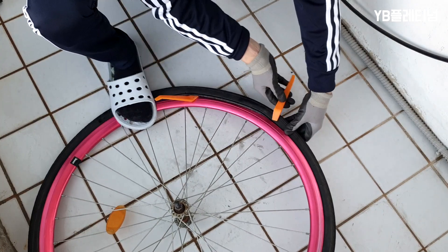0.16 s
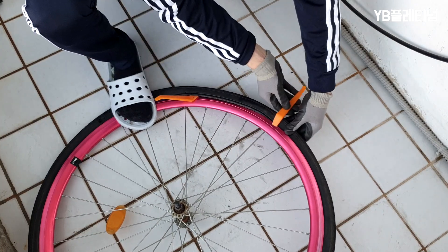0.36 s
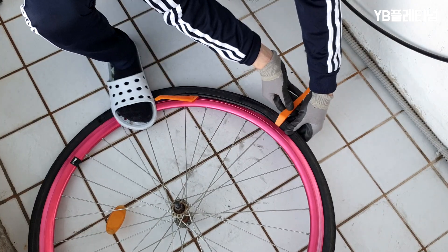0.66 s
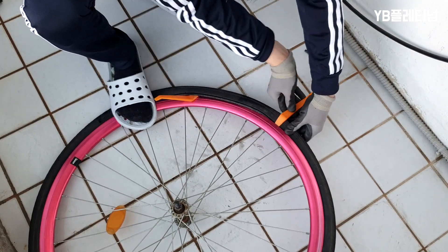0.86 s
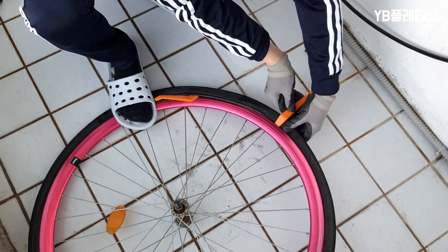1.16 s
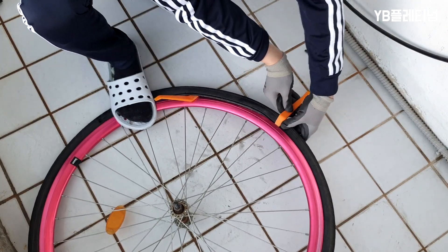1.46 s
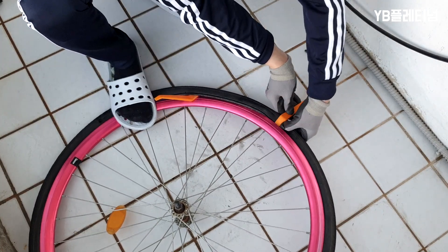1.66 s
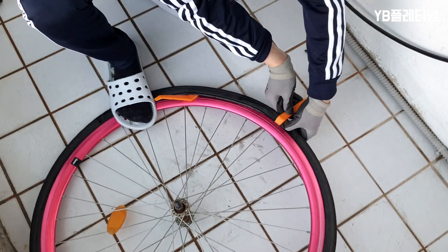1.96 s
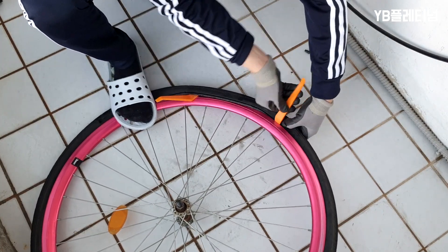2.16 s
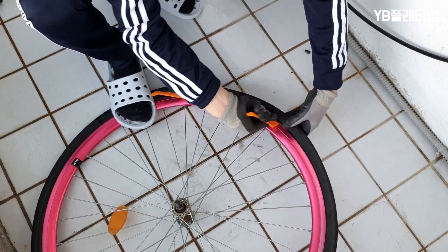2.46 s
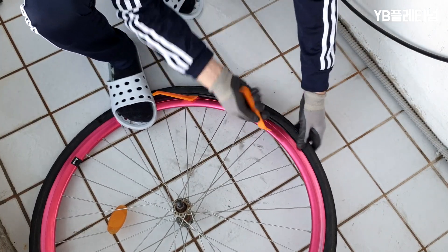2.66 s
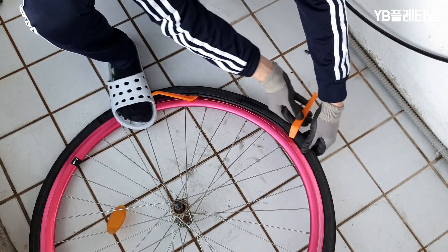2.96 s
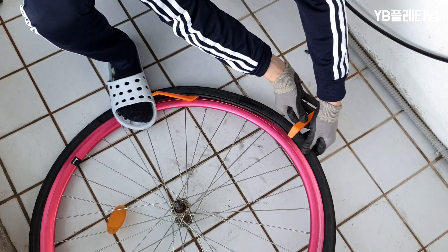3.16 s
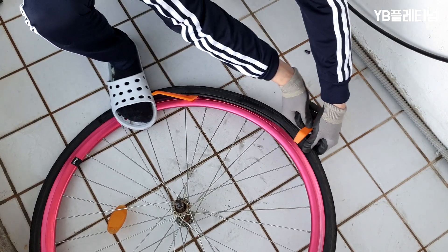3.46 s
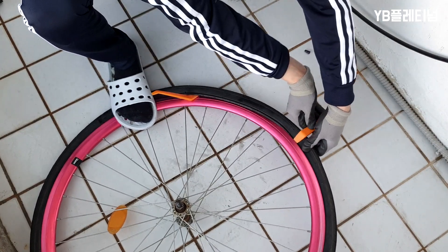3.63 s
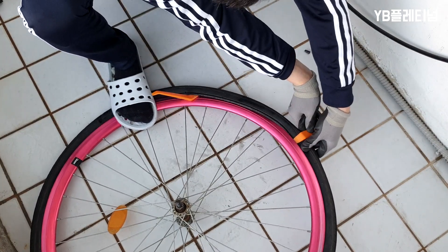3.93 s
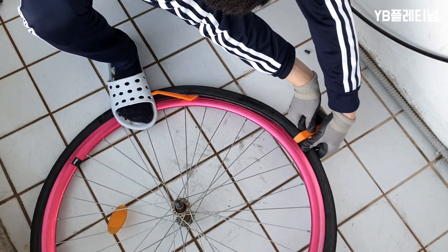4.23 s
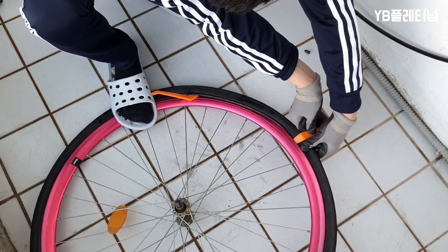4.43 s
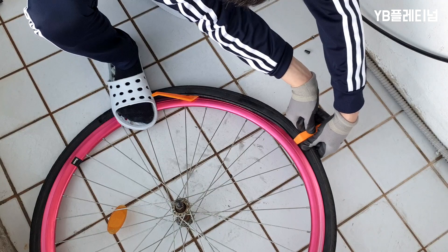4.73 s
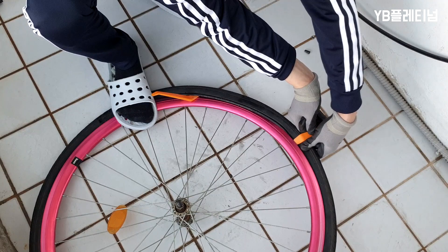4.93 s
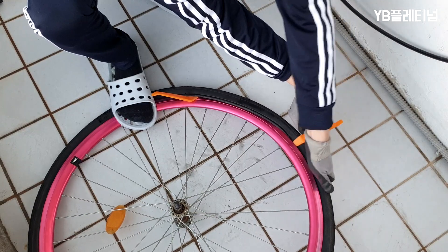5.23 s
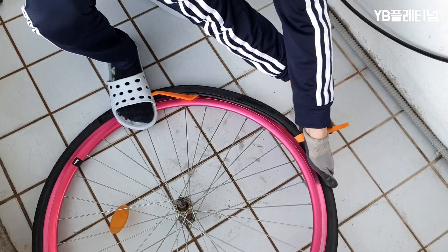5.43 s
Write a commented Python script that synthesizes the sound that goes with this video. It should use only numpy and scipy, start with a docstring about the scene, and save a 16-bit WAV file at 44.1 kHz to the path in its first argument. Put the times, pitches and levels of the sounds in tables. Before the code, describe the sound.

Plastic levers prise a bicycle tire off its metal rim in a small tiled room, with rubbing, clicks, thuds and ringing snaps.

```python
"""In a small tiled room, plastic levers prise a bicycle tire off its metal rim on the floor.
The slipping bead snaps in noise bursts and rings tire, spokes and rim as banks of fading sines.
Lever ticks are short noise clicks; gloves, lever and rubber rub in streams of tiny slips; faint squeals glide.
The pressed wheel shudders as a wavering low hum over a faint steady rush of air, made of coloured noise."""
import sys
import numpy as np
from scipy import signal
from scipy.fft import rfft, irfft, next_fast_len
from scipy.io import wavfile
from scipy.ndimage import map_coordinates

SR = 44100
rng = np.random.default_rng(int(sys.argv[2]) if len(sys.argv) > 2 else 0)


def waveform_to_disk(signal):
    """Save audio, clipped to [-1, 1], as 16-bit WAV at the path in sys.argv[1]."""
    frames = np.transpose(np.atleast_2d(signal))
    scaled = np.clip(frames, -1, 1) * 32767
    samples = np.round(scaled).astype(np.int16)
    wavfile.write(sys.argv[1], SR, samples)


N = 246430
TIME = np.arange(N) / SR
CUTOFF_HZ = 15900
# Every level below is a mix level, ahead of the final left and right gains.


def from_db(db):
    """Decibels to gain."""
    return 10 ** (np.asarray(db) / 20)


def rms(x):
    """Root mean square."""
    return np.sqrt(np.mean(x ** 2) + 1e-20)


def at_hz(points, hz):
    """Read a table on a log-frequency axis."""
    f, value = np.transpose(points)
    return np.interp(np.log(np.maximum(hz, 1)), np.log(f), value)


def band(x, low, high, order=2):
    """Causal band-pass."""
    sos = signal.butter(order, [low, min(high, .45 * SR)], "band", fs=SR, output="sos")
    return signal.sosfilt(sos, x)


def coloured(x, spectrum):
    """Shape a sound with a spectrum curve, then scale it to rms 1."""
    size = next_fast_len(x.shape[-1])
    gain = from_db(at_hz(spectrum, np.fft.rfftfreq(size, 1 / SR)))
    y = irfft(rfft(x, size) * gain, size)[..., :x.shape[-1]]
    return y / rms(y)


def drift(per_s):
    """Smooth random wandering through normal-distributed knots, per_s of them a second."""
    knots = rng.standard_normal(4096)
    return map_coordinates(knots, [TIME * per_s], order=3, mode="wrap")


def add(out, sound, s):
    """Mix a sound in at a time."""
    i = max(round(s * SR), 0)
    out[:, i:i + sound.shape[-1]] += sound[:, :N - i]


def at_ears(x, lag_s=.00034):
    """Direct sound reaches the left ear a moment before the right."""
    late = np.pad(x, (round(lag_s * SR), 0))[:len(x)]
    return np.array([x, late])


# how alike the two ears hear the sound: [f/Hz, left-right correlation 0-1]
EAR_LIKENESS = [(60, .97), (140, .95), (300, .75), (640, .5), (1400, 0.05), (16000, 0.02)]


def stereo_noise(size):
    """White noise, alike at both ears in the bass and nearly unrelated in the treble."""
    mid, side = rfft(rng.standard_normal((2, size)))
    alike = np.clip(at_hz(EAR_LIKENESS, np.fft.rfftfreq(size, 1 / SR)), -.99, .99)
    shared, opposed = np.sqrt(1 + alike) * mid, np.sqrt(1 - alike) * side
    return irfft(shared + opposed * [[1], [-1]], size) / np.sqrt(2)


# how long the tiles hold the sound: [f/Hz, t60/s]
ROOM_DECAY = [(100, 1), (260, 0.67), (700, 0.49), (1840, 0.42), (4850, 0.39), (12800, 0.22)]


def tiled_room(size=32768, build_up_s=0.00093):
    """Dense echoes of the tiles, dying sooner in the treble; unit energy at each ear on average."""
    t, hz = np.arange(size) / SR, np.fft.rfftfreq(size, 1 / SR)
    noise, tail = rfft(stereo_noise(size)), 0
    centres, t60s = np.transpose(ROOM_DECAY)
    # overlapping bands, each with its own decay
    for weights, t60 in zip(np.eye(len(centres)), t60s):
        one_band = irfft(noise * at_hz(np.c_[centres, weights], hz))
        tail = tail + one_band * from_db(-60 * t / t60)
    tail = tail * (1 - np.exp(-t / build_up_s))
    return tail / (rms(tail) * np.sqrt(size))


def heard(x, room, wet_db):
    """Direct sound plus the room's answer."""
    answer = signal.fftconvolve(x, room, axes=1)[:, :x.shape[-1]]
    return x + from_db(wet_db) * answer


# colour of the steady air in the room: [f/Hz, density level/dB per Hz]
AIR_COLOUR = [(20, -17), (55, 1), (100, -8), (160, -13), (300, -15), (630, -15.5), (1000, -11),
              (1350, -13.5), (1650, -19.5), (2100, -30), (4000, -37), (7000, -36.5), (8500, -39),
              (13000, -35), (16000, -37)]
AIR_DB = -66.5   # rms between 300 and 1800 Hz


def air():
    """Steady room noise with a soft hump near one kilohertz."""
    noise = coloured(stereo_noise(next_fast_len(N, True))[:, :N], AIR_COLOUR)
    return from_db(AIR_DB) * noise / rms(band(noise, 300, 1800))


# pushes that set the wheel shuddering: [start t/s, length t/s, f/Hz, level/dB]
SHUDDER_PUSHES = [(0.0, 0.52, 54.5, -64), (0.817, .07, 54, -71), (0.936, .1, 47, -64.5),
                  (1.06, 0.52, 52, -57.5), (1.85, 0.44, 51.9, -59.5), (2.232, 0.049, 57, -56),
                  (2.577, 0.084, 54.6, -61.5), (2.725, 0.17, 54.2, -56.5), (2.992, 0.092, 47.4, -67),
                  (3.284, 0.053, 53, -51.5), (3.356, 0.072, 55, -51), (3.485, .05, 55, -58),
                  (3.677, 0.33, 60.6, -61), (4.288, 0.057, 55.4, -62), (4.77, 0.076, 55, -65),
                  (5.117, 0.17, 59.5, -53), (5.41, .18, 65.2, -54.5)]
SHUDDER_ATTACK_S, SHUDDER_FADE_S = 0.029, 0.041   # swell; fall by 20 dB


def shudder(waver_hz=2.83, unsteady_db=0.5):
    """The wheel's lowest bending motion: it swells with each push, wavers under the hands and dies on release."""
    out, waver = np.zeros(N), waver_hz * drift(21.02)
    for s, length_s, hz, db in SHUDDER_PUSHES:
        released_s = np.maximum(TIME - s - length_s, 0)
        swell = np.clip((TIME - s) / SHUDDER_ATTACK_S, 0, 1)
        gain = swell * from_db(db - 20 * released_s / SHUDDER_FADE_S)
        hum = np.sin(2 * np.pi * np.cumsum(hz + waver) / SR)
        out += gain * np.sqrt(2) * hum
    return out * from_db(unsteady_db * drift(14))


MIN_FADE_S = .06   # the room keeps a rub from stopping dead; shorter or negative fades become this


def strokes(rows):
    """Gain over time: each rub swells as the hand speeds up, then dies away."""
    gain = np.zeros(N)
    for s, swell_s, fade_s, db in rows:
        age = np.maximum(TIME - s, 0)
        fall_db = 20 * np.maximum(age - swell_s, 0) / max(fade_s, MIN_FADE_S)
        gain += np.minimum(age / swell_s, 1) ** 2 * from_db(db - fall_db)
    return gain


def friction(rows, colour, room, slips_per_s, size_db, wet_db):
    """Rubbing is a stream of tiny slips of uneven size, swelling with the stroke."""
    slips = (rng.random(N) < slips_per_s / SR) * rng.choice([-1, 1], N)
    sizes = from_db(size_db * np.minimum(rng.exponential(1, N), 4))
    rub = heard(at_ears(coloured(slips * sizes, colour)), room, wet_db)
    return rub / rms(rub) * strokes(rows)


# gloves and sleeves rubbing: [start t/s, swell t/s, 20 dB fade t/s before the minimum, level/dB]
RUSTLE_STROKES = [(0.0, 0.025, 0.13, -51), (1.10, 0.041, 0.0748, -51), (1.19, 0.038, 0.08, -51.5),
                  (2.63, 0.021, 0.61, -55.5), (2.80, 0.025, 0.03, -55.5), (3.36, 0.11, -0.16, -59.5),
                  (4.265, 0.011, 0.4, -66.5), (4.86, 0.045, 0.54, -66.5), (5.18, 0.011, 0.44, -64.5),
                  (5.36, 0.032, .15, -62.5)]
# colour of the cloth: [f/Hz, density level/dB per Hz]
CLOTH_COLOUR = [(1760, 3), (3000, -15), (4260, -7), (4800, -1), (6530, 5.5), (10200, 4), (11800, 7),
                (15500, 2.5), (16000, -14)]


def rustle(room):
    """Gloves and sleeves rub in a dense, bright stream of slips."""
    return friction(RUSTLE_STROKES, CLOTH_COLOUR, room, slips_per_s=1300, size_db=6.5, wet_db=14.0)


# rubber bead dragging over the rim: [start t/s, swell t/s, 20 dB fade t/s before the minimum, level/dB]
DRAG_STROKES = [(0.0, 0.045, 0.3, -61.5), (.15, 0.037, -0.36, -62), (.42, 0.067, 0.46, -59),
                (1.24, 0.072, 0.3, -55.5), (1.4, 0.064, -0.24, -60.5), (2.25, 0.041, 0.27, -58.5),
                (2.8, 0.084, 0.53, -59.5), (4.25, 0.084, -0.08, -60.5)]
# colour of the rubber: [f/Hz, density level/dB per Hz]
RUBBER_COLOUR = [(41, -59), (70, -2.5), (224, -11.5), (313, -33), (397, -7), (447, -18), (510, -2),
                 (595, -27), (792, -5.5), (946, -12), (1200, -9), (1560, -18), (2640, -120)]


def drag(room):
    """The rubber bead drags over the rim in sparse, dark slips."""
    return friction(DRAG_STROKES, RUBBER_COLOUR, room, slips_per_s=130, size_db=0.5, wet_db=-4.0)


# lever sliding between bead and rim: [start t/s, swell t/s, 20 dB fade t/s before the minimum, level/dB]
SCRAPE_STROKES = [(0.0, 0.0014, 0.09, -47.5), (.42, 0.078, -0.4, -61), (1.16, 0.11, -0.2, -59.5),
                  (2.0, 0.076, 0.0936, -51.5), (2.27, 0.045, 0.2, -61.5), (2.45, .018, 0.84, -73),
                  (2.55, .05, 0.42, -64), (2.66, 0.027, 0.04, -55.5), (3.34, .05, -0.14, -66),
                  (4.22, 0.042, 0.8, -73), (4.86, 0.057, 0.26, -64.5)]
# colour of the sliding lever: [f/Hz, density level/dB per Hz]
SLIDE_COLOUR = [(530, -32), (900, -26), (1340, 6), (2250, -2.5), (2450, -2.5), (4360, -4.5), (7490, -0.5),
                (8230, -9), (15000, -12)]


def scrape(room):
    """The lever slides between bead and rim in slips blurred by the room."""
    return friction(SCRAPE_STROKES, SLIDE_COLOUR, room, slips_per_s=600, size_db=-2.0, wet_db=28.0)


# thin squeals while the lever bears on the tire, one curve each: [t/s, pitch f/Hz, relative level/dB]
SQUEAL_CURVES = [
    [(.78, 9436, -82), (.85, 11950, -65.5), (.92, 13900, -61.5), (1.01, 13760, -66), (1.045, 12700, -63),
     (1.1, 14050, -61), (1.23, 11370, -62)],
    [(2.75, 11950, -60), (2.9, 12200, -68), (2.99, 11750, -58), (3.05, 11500, -69), (3.1, 10270, -67)],
    [(4.37, 10300, -91), (4.47, 12960, -68), (4.56, 13640, -63.5), (4.69, 14100, -62.5), (4.76, 13000, -61),
     (4.84, 13650, -65), (5.0, 11250, -76)],
]
# strands of a squeal: [f/Hz at the reference pitch, pitch following 0-1 (at least 0.1), relative level/dB]
STRANDS = [(7710, 0.2, 0.5), (9900, 0.7, -15), (11500, 1, -11), (13900, 1, 2)]
# colour of the hiss that comes with them: [f/Hz, density level/dB per Hz]
HISS_COLOUR = [(3000, -15), (5500, -11), (7400, 6), (8400, -26), (9500, 3.5), (13500, -1.5), (15500, -11)]
SQUEAL_REFERENCE_HZ, SQUEAL_FADE_S = 13900, .02
SQUEAL_WAVER, ROUGHNESS_PER_S = .013, 320   # share by which each strand wavers; random level knots per second


def squeals(room, hiss_db=-2.0):
    """Rough high strands in a soft hiss; they glide together as the pressure changes."""
    gain, pitch = np.zeros(N), np.zeros(N)
    for rows in SQUEAL_CURVES:
        s, hz, db = np.transpose(rows)
        inside_s = np.minimum(TIME - s[0], s[-1] - TIME)
        sounding = np.clip(inside_s / SQUEAL_FADE_S + 1, 0, 1)
        gain += sounding * from_db(np.interp(TIME, s, db))
        pitch += (sounding > 0) * np.interp(TIME, s, hz) / SQUEAL_REFERENCE_HZ
    strands = 0
    for hz, follows, db in STRANDS:
        glide = hz * pitch ** np.clip(follows, .1, 1) * (1 + SQUEAL_WAVER * drift(25))
        tone = np.sin(2 * np.pi * np.cumsum(glide) / SR)
        strands = strands + from_db(db) * drift(ROUGHNESS_PER_S) * tone
    hiss = from_db(hiss_db) * coloured(rng.standard_normal((2, N)), HISS_COLOUR)
    return heard(gain * (at_ears(strands) + hiss) / 2, room, wet_db=-2.0)


# light ticks of the lever tip: [t/s, level/dB before the band-pass]
TIP_TICKS = [(0.0024, -42), (0.092, -36.5), (0.185, -43), (1.108, -47), (1.341, -38.5), (1.453, -46.5),
             (2.831, -55), (3.1495, -58.5), (4.275, -60), (5.249, -47.5)]


def ticks(room, low_hz=6100, size=2048):
    """The plastic tip catches and lets go with a thin click about a millisecond long."""
    out, t = np.zeros((2, N)), np.arange(size) / SR
    fade = np.exp(-t / .001)
    for s, level_db in TIP_TICKS:
        click = rng.standard_normal(size) * fade
        add(out, from_db(level_db) * at_ears(click), s)
    return heard(band(out, low_hz, CUTOFF_HZ, order=3), room, wet_db=8.5)


# the lever springs free: [t/s, direct peak level/dB]
LEVER_TWANGS = [(3.5136, -41.5)]
# modes of the plastic lever: [f/Hz, relative level/dB]
LEVER_MODES = [(2620, -3), (2880, -2), (3035, -1.5), (3175, -0.5), (3330, -5), (3600, -3)]
LEVER_T60_S = .09


def twangs(room, wet_db=3.0, size=8192):
    """The bent lever straightens and rings briefly in its own few modes."""
    out, t = np.zeros((2, N)), np.arange(size) / SR
    hz, mode_db = np.transpose(LEVER_MODES)[:, :, None]
    for s, peak_db in LEVER_TWANGS:
        signs = rng.choice([-1, 1], hz.shape)
        modes = signs * np.sin(2 * np.pi * hz * t) * from_db(mode_db - 60 * t / LEVER_T60_S)
        ring = np.sum(modes, axis=0)
        add(out, from_db(peak_db) * at_ears(ring / np.abs(ring).max()), s)
    return heard(out, room, wet_db)


# modes of the wheel with its tire and spokes: [f/Hz, relative level/dB, t60 t/s]
RIM_AND_TIRE_MODES = [(84, -2, .3), (143, 2, .38), (225, 1, .3), (278, -11, .28), (345, -12, .35),
                      (382, -13, .6), (416, -9, .7), (508, 2, .2), (524, 2, .28), (648, 4, .25),
                      (664, 1, .4), (697, 2, .45), (756, -12, .55), (814, -9, .7), (1073, -8, .36),
                      (1360, -13, .25), (1459, -12, .25), (1590, -10, .25), (1657, -3, .3), (1789, -4, .23),
                      (2008, -9, .26), (2230, -9, .22), (3268, -11, .17), (3620, -6, .2), (3730, -6, .22),
                      (3836, -2, .24), (3955, -3, .2), (4076, -7, .2)]


def wheel_modes(t, spoke_low_hz=630, spoke_high_hz=870, spoke_db=-16.5, spoke_t60=0.97, swell_s=0.0034, count=14):
    """Ringing of the wheel and of its unevenly tensioned spokes, as (ear, mode, time)."""
    spokes = [(hz, spoke_db, spoke_t60) for hz in rng.uniform(spoke_low_hz, spoke_high_hz, count)]
    hz, mode_db, t60 = np.transpose(list(RIM_AND_TIRE_MODES) + spokes)[:, :, None]
    # short waves reach the two ears out of step
    likeness = np.clip(at_hz(EAR_LIKENESS, hz), -1, 1)
    apart = np.arccos(likeness) * rng.choice([-1, 1], hz.shape) / 2
    # the ring swells as it spreads round the rim
    fade = from_db(mode_db - 60 * t / t60) * (1 - np.exp(-t / swell_s))
    return np.array([np.sin(2 * np.pi * hz * t + side * apart) * fade for side in (-1, 1)])


def unit_blow(x):
    """Scale a blow to rms 1 over its first 50 ms."""
    return x / rms(x[:, :SR // 20])


# what each contact drives, from wheel boom, tire casing, bead, spokes, low rim and high rim to lever tip:
# [f/Hz, tire thud level/dB, metal ring level/dB, plastic crack level/dB]
WHEEL_PARTS = [(108, -3, -3, -43), (238, -4.5, -7, -28.5), (470, -0.5, -6, -9.5), (750, -21.5, 0.5, -20),
               (1440, -10.5, -4, -5), (4400, -33.5, -3, -4), (12000, -41.5, -14.5, 0)]
CASING_PART, THUD_PIVOT_HZ = 1, 440


def contact(thud_db, tilt_db, casing_db, ring_db, crack_db):
    """Level of each part of the wheel in a knock: rubber thuds, metal rings and plastic cracks together."""
    hz, thud, ring, crack = np.transpose(WHEEL_PARTS)
    is_casing = np.arange(len(hz)) == CASING_PART
    thud = thud + tilt_db * np.log2(hz / THUD_PIVOT_HZ) + casing_db * is_casing
    gains = from_db([thud + thud_db, ring + ring_db, crack + crack_db])
    return 20 * np.log10(np.linalg.norm(gains, axis=0))


# borders between the parts of the wheel, boom to lever tip: [f/Hz]
PART_BORDERS = [65, 185, 320, 600, 950, 2500, 7800, 21000]


def driven(blow, parts_db, order=14):
    """Set how strongly each part of the wheel, from boom to crack, sounds in its first 50 ms."""
    size = blow.shape[-1]
    padded = size * 5 // 4
    hz, spectrum = np.fft.rfftfreq(padded, 1 / SR), rfft(blow, padded)
    below = [1 / (1 + (hz / edge) ** order) for edge in PART_BORDERS]
    parts = [irfft(spectrum * (upper - lower))[:, :size] for lower, upper in zip(below, below[1:])]
    return sum(from_db(db) * unit_blow(part) for part, db in zip(parts, parts_db))


# lever and bead knock on the wheel: [t/s, tire thud level/dB, thud tilt/dB per octave,
# extra casing level/dB, metal ring level/dB, plastic crack level/dB]
WHEEL_KNOCKS = [(0.25, -78.5, 13, -4, -71.5, -57), (1.297, -61, 5, -3, -86, -80),
                (1.343, -59.5, -3, -2, -92, -63.5), (1.493, -56, 0, -2, -83, -77),
                (1.8287, -45.5, 3.5, 5.5, -53.5, -72), (2.286, -64, -3.5, 3.5, -91, -70),
                (2.323, -59, 0, 5, -84, -68.5), (2.616, -55.5, 2.5, -6, -64, -51.5),
                (3.513, -46, 1, -11, -73, -49), (4.884, -69, 4, -11.5, -71, -86),
                (5.064, -45.5, 0.5, -0.5, -35, -53.5), (5.309, -41.5, 0.5, -3.5, -57, -78),
                (5.415, -45, 3, 9, -55, -61)]
# colour of the snap where metal takes the blow: [f/Hz, density level/dB per Hz]
METAL_SNAP_COLOUR = [(60, 0), (200, -8), (400, -0.5), (620, 1.5), (850, -2.5), (1150, -6), (1750, -3.5),
                     (2800, -7.5), (3300, -3.5), (3750, 0), (4150, -5.5), (4600, -9), (5700, -12),
                     (6400, -4), (7300, -8), (8600, -17.5), (16000, -23)]
# colour of the snap where the plastic lever takes it: [f/Hz, density level/dB per Hz]
PLASTIC_SNAP_COLOUR = [(60, -3), (150, -7.5), (260, -5), (480, 0.5), (750, -3), (1200, -3.5), (1900, -3.5),
                       (2500, -7), (3100, -1.5), (4200, -7.5), (5200, -0.5), (7400, -1), (8800, -9),
                       (16000, -15)]
PLASTIC_LIFT_DB = 4.0   # a plastic crack stands further above the wheel's ringing


def knocks(room, echo_db=16.0, modes_db=-4.0, scatter_db=1.0, size=32768):
    """Each slip snaps and rings the wheel; where the lever bears decides how hard each part is driven."""
    out, t = np.zeros((2, N)), np.arange(size) / SR
    modes = wheel_modes(t)
    count = modes.shape[1]
    release = np.exp(-t / .0018)
    for s, thud_db, tilt_db, casing_db, ring_db, crack_db in WHEEL_KNOCKS:
        signs = rng.choice([-1, 1], count)
        strengths = from_db(modes_db + scatter_db * rng.standard_normal(count)) * signs
        # the snap is over in a few milliseconds; the tiles draw it out
        burst = rng.standard_normal(size) * release
        snap = at_ears(burst / np.linalg.norm(burst)) + from_db(echo_db) * tiled_room()
        if ring_db > crack_db:
            colour, lift_db = METAL_SNAP_COLOUR, 0
        else:
            colour, lift_db = PLASTIC_SNAP_COLOUR, PLASTIC_LIFT_DB
        padded = np.pad(snap, [(0, 0), (0, size // 4)])
        snap = from_db(lift_db) * unit_blow(coloured(padded, colour)[:, :size])
        blow = heard(strengths @ modes, room, wet_db=-16.0) + snap
        parts_db = contact(thud_db, tilt_db, casing_db, ring_db, crack_db)
        add(out, driven(blow, parts_db), s)
    return out


LEFT_DB, RIGHT_DB = 2, 4


def scene():
    """Air and all the work on the wheel, a little louder on the right."""
    room = tiled_room()
    rubbing = rustle(room) + drag(room) + scrape(room)
    lever = squeals(room) + ticks(room) + twangs(room)
    mix = air() + shudder() + rubbing + lever + knocks(room)
    return mix * from_db([[LEFT_DB], [RIGHT_DB]])


def record(dry):
    """A steep low-pass removes the treble above the cutoff."""
    return signal.sosfilt(signal.ellip(10, .2, 70, CUTOFF_HZ, fs=SR, output="sos"), dry)


dry = scene()
out = record(dry)
waveform_to_disk(out)
```